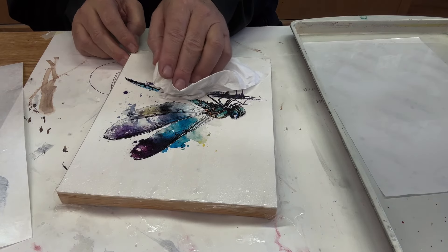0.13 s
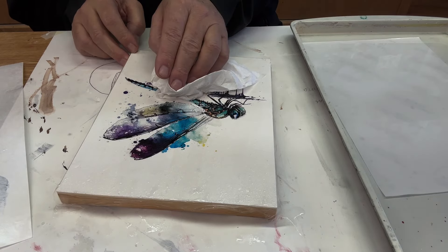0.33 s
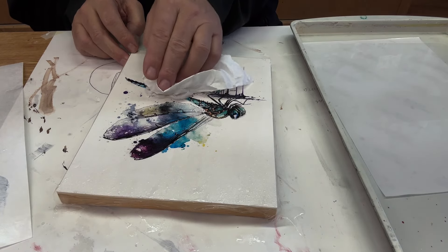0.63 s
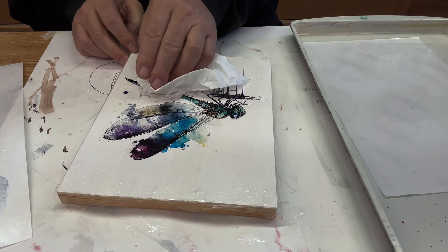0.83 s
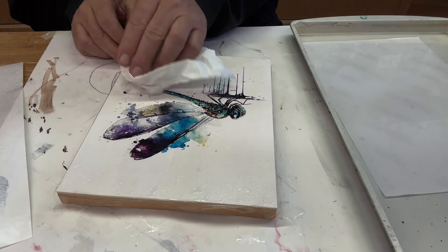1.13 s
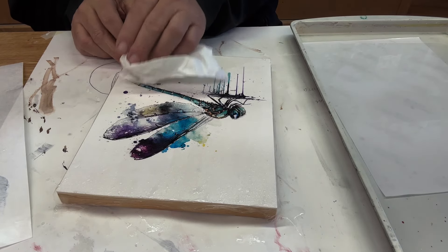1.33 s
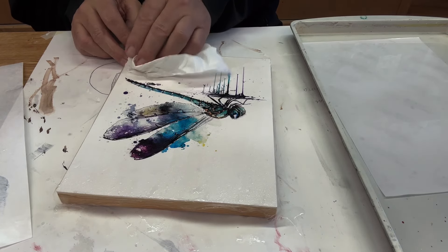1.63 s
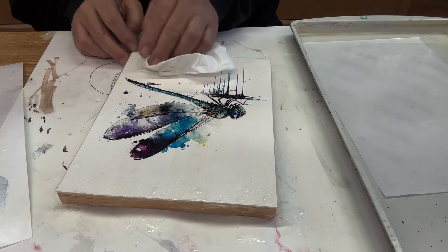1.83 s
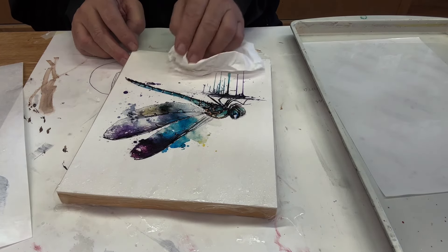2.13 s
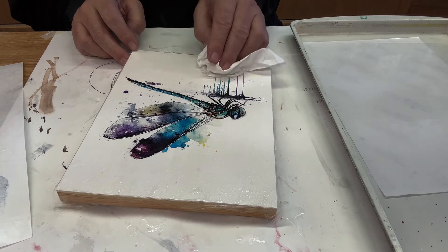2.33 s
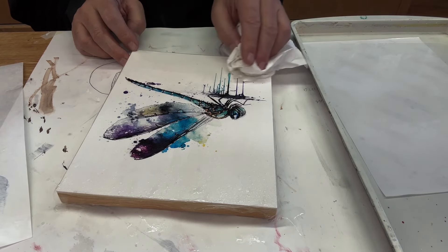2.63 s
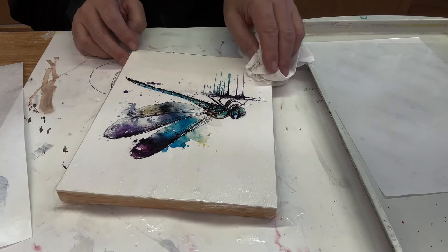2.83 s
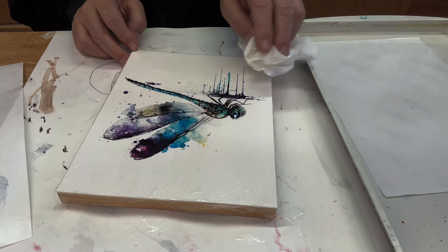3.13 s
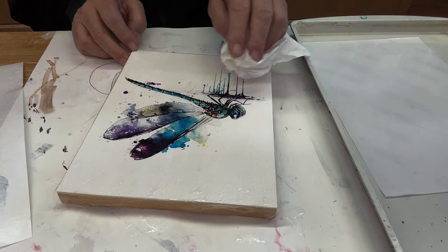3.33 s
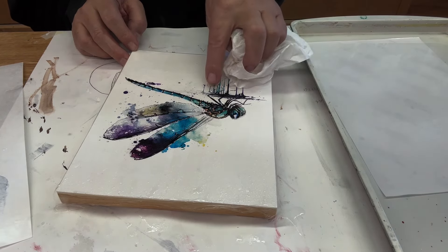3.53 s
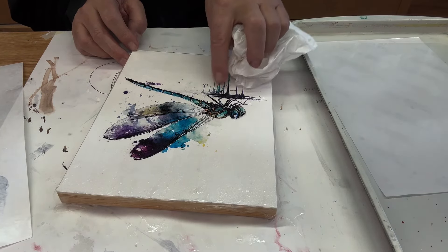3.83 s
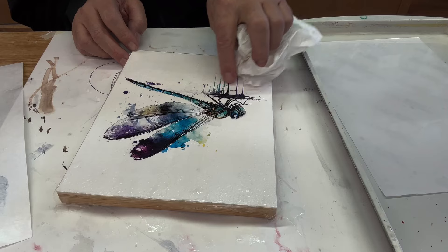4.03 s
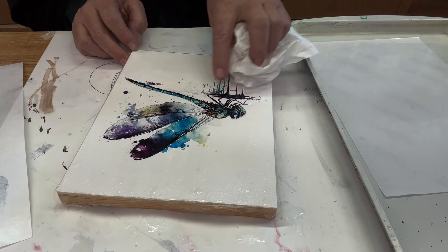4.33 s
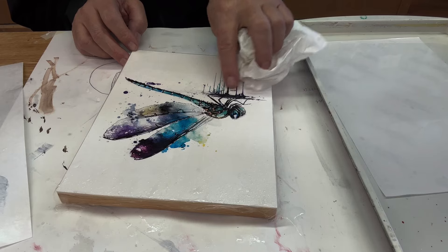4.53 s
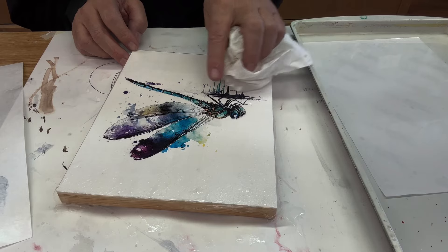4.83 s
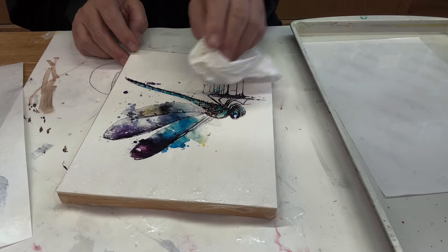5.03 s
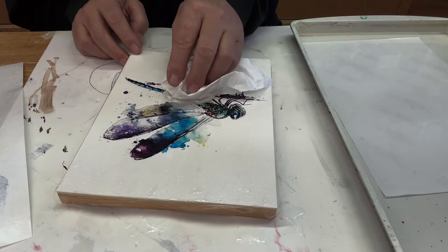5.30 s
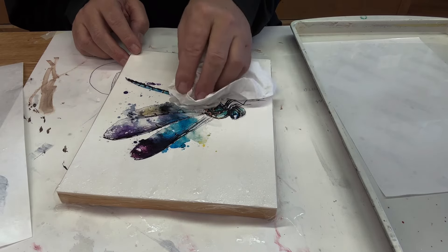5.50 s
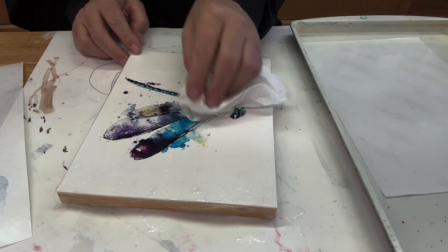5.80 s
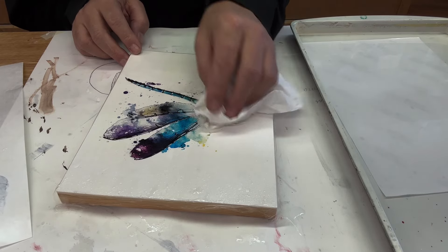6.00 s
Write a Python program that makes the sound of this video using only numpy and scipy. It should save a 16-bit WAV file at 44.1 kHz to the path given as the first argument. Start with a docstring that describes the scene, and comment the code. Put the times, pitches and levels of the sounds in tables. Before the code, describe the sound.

Close mono sound of gentle handwork at a table indoors: breathy paper wipes, irregular soft dabs and small wet clicks. Three short hollow knocks of a light board come quickly, ending in a hard clack. It quietens to paper crackles and thin, grainy skin rubs, before soft crunchy presses return over faint, steady room hush.

```python
"""Damp towel on a wooden panel

A damp paper towel is wiped and dabbed over a wet decal on a panel lying on a work table: filtered noise and
catching fibres make the rub, and short bursts of them the dabs. As the towel is swept off its edge, the panel
rocks and knocks three times, ringing in damped modes, and a sharp click follows. A fingertip then smooths the
decal in short strokes of high, grainy noise, and the dabbing resumes. Low booms of the table, small clicks and
paper snaps lie between. Close, mono, with sparse reflections and the steady hush of a quiet room."""
import sys
import numpy as np
from scipy import signal
from scipy.fft import rfft, irfft, next_fast_len
from scipy.io import wavfile
from scipy.ndimage import uniform_filter1d

SR = 44100
rng = np.random.default_rng(int(sys.argv[2]) if len(sys.argv) > 2 else 0)


def transcribe(u):
    """Save the signal u as a 16-bit wav file named by the first command-line argument.

    u: samples, shape (n,) or (channels, n), limited to [-1, 1]; the rate is SR.
    q: integer samples, one column per channel.
    """
    v = np.clip(np.atleast_2d(u).T, -1, 1)
    q = np.round(v * 32767).astype(np.int16)
    wavfile.write(sys.argv[1], SR, q)


N = 271656
TIME = np.arange(N) / SR  # s

# the towel is pressed down and peels off again:
# (time of the peak [s], half length [s], level [dB], weight on the panel [dB], level of the peel [dB])
DABS = [(0.848, 0.023, -49, -9, -59.5), (1.068, 0.015, -44, -9, -56), (1.262, 0.02, -42.5, -8.5, -61),
        (1.478, 0.012, -39.5, -7, -55.5), (1.681, 0.013, -41, -13, -56.5), (1.889, 0.014, -41.5, -6, -56),
        (2.13, 0.0073, -45.5, -9, -62), (2.381, 0.0063, -40.5, -2.5, -57), (4.115, 0.012, -55.5, -5, -92),
        (5.182, 0.0026, -47, -2, -45), (5.513, .012, -41, -5, -51.5), (5.694, 0.014, -42, -3.5, -49),
        (5.883, 0.019, -42.5, -2, -50.5), (6.076, 0.017, -42, -4, -54)]


def amp(db):
    """Decibels to gain."""
    return 10 ** (np.asarray(db) / 20)


def unit(x):
    """Scales to rms 1."""
    return x / np.sqrt(np.mean(x ** 2) + 1e-20)


def peaked(x, db):
    """Scales to a given peak level."""
    return amp(db) * x / (abs(x).max() + 1e-20)


def add(mix, s, sound):
    """Mixes a sound in at time s."""
    part = mix[max(round(s * SR), 0):][:len(sound)]
    part += sound[:len(part)]


def colour(x, spectrum):
    """Filters by a spectrum drawn on a log-frequency axis; rms 1."""
    hz, db = np.transpose(spectrum)
    size = next_fast_len(len(x))
    bins_hz = np.fft.rfftfreq(size, 1 / SR)
    gain = amp(np.interp(np.log(bins_hz + 1), np.log(hz), db))
    return unit(irfft(rfft(x, size) * gain, size)[:len(x)])


def drift(rate_hz):
    """Slow random wander of rms 1."""
    hz = np.fft.rfftfreq(N, 1 / SR)
    smoothed = rfft(rng.standard_normal(N)) / (1 + (hz / rate_hz) ** 2)
    return unit(irfft(smoothed, N))


def swell(s, rise, fall):
    """A smooth bell-shaped rise to 1 at time s, and a smooth fall."""
    out = np.zeros(N)
    near = slice(*np.searchsorted(TIME, [s - 4 * rise, s + 4 * fall]))
    t = TIME[near] - s
    out[near] = np.exp(-(t / np.where(t < 0, rise, fall)) ** 2)
    return out


def ring(modes, wave=np.sin):
    """Damped modes (frequency [Hz], level [dB], t60 [s]) after one impulse."""
    t = np.arange(SR // 4) / SR
    return sum(amp(db - 60 * t / t60) * wave(2 * np.pi * hz * t) for hz, db, t60 in modes)


def friction(spectrum, per_s, spread_db, grainy):
    """Countless tiny slips blur to a hiss; a share of the energy comes as separate catches of fibres."""
    sizes = amp(spread_db * np.minimum(rng.exponential(1, N), 4))
    catches = sizes * rng.choice([-1, 1], N) * (rng.random(N) < per_s / SR)
    share = np.clip(grainy, 0, 1)
    slips = np.sqrt(1 - share) * rng.standard_normal(N)
    return colour(np.sqrt(share) * unit(catches) + slips, spectrum)


def shifting(x, tilt_db, patchy_db):
    """Folds of the wad come and go: the hiss tilts (dB per octave), and patches of it swell and fade."""
    hz, t, z = signal.stft(x, SR, nperseg=256)
    across_hz = uniform_filter1d(rng.standard_normal(z.shape), size=5, axis=0)
    patches = unit(uniform_filter1d(across_hz, size=28, axis=1))
    octaves = np.log2(np.clip(hz, 2500, 9500) / 5000)[:, None]
    tilt = np.interp(t, TIME, tilt_db + 2.0 * drift(rate_hz=13))
    gain_db = octaves * tilt + patchy_db * patches
    return unit(signal.istft(z * amp(gain_db), SR, nperseg=256)[1][:N])


def crease(hz):
    """The dry snap of one fold of paper: four high modes that die within milliseconds."""
    return ring([(hz, 0, .004), (hz * 1.31, -3, .004), (hz * 1.7, -9, .003), (hz * 0.81, -5, .003)])


def room_hush():
    """Steady noise in the colour of the quiet room."""
    # (frequency [Hz], relative level [dB])
    hush_spectrum = [(20, -6.5), (75, -18.5), (120, -3), (175, -16.5), (240, -4), (300, -20), (700, -25.5),
                     (1200, -22.5), (1800, -22.5), (9000, -23), (15500, -26.5)]
    level_db = -65.5
    return amp(level_db) * colour(rng.standard_normal(N), hush_spectrum)


def rubbing():
    """Contact, slides and peels add up in power; each weighs on rasp and brightness by its share of it."""
    # the held wad rustles faintly as it touches the panel: (time [s], level [dB])
    contact_curve = [(0, -55), (.27, -61.5), (.37, -70), (.43, -62.5), (.65, -59), (.8, -62.5),
                     (1.29, -59.5), (1.55, -54.5), (2.02, -57.5), (2.26, -66), (2.8, -62), (3.35, -69),
                     (3.9, -71.5), (4.2, -80.5), (4.79, -74.5), (4.92, -58.5), (5.45, -57.5), (6.16, -61)]
    # the towel slides, gathering speed and slowing: (time of full speed [s], rise [s], fall [s],
    # level [dB], rasp of the surface [dB], brightness [dB per octave])
    slides = [(0.059, 0.23, 0.17, -51, 2, -1.5), (.52, 0.078, 0.11, -59.5, 4, 3.5),
              (.74, 0.046, .03, -64.5, 9, 1), (1.345, 0.022, .14, -51, 2.5, 1),
              (2.141, 0.078, 0.064, -49.5, -1.5, -0.5), (2.385, 0.043, 0.05, -52.5, 2, -1.5),
              (2.621, 0.052, .1, -49, 3, 1), (2.889, 0.042, 0.088, -51, 3.5, 2),
              (3.14, .12, 0.18, -57, -1, -1), (3.438, 0.042, 0.1, -49.5, 0.5, 0.5),
              (3.63, 0.064, 0.032, -62, 1, 1.5), (4.02, 0.092, .05, -64.5, -0.5, 3),
              (4.34, 0.048, 0.1, -61, -1, 3), (4.446, 0.025, 0.024, -56, 0.5, -2),
              (4.56, 0.079, 0.063, -59.5, -6.5, -2), (4.935, 0.047, 0.033, -57.5, -2.5, 3.5),
              (5.05, 0.03, 0.036, -57.5, -1.5, 4), (5.165, 0.041, 0.059, -49.5, -8, 2),
              (5.394, 0.039, 0.039, -51.5, -2, -0.5)]
    peel_delay_s, peel_rise_s, peel_fall_s = 0.071, 0.038, 0.023  # the wad lets go a moment after each press

    # each move: (gain, rasp [dB], brightness [dB per octave])
    moves = [(amp(np.interp(TIME, *np.transpose(contact_curve))), -1, 0)]
    for s, rise, fall, db, rasp_db, tilt_db in slides:
        moves.append((amp(db) * swell(s, rise, fall), rasp_db, tilt_db))
    peels = sum(amp(peel_db) * swell(s + peel_delay_s, peel_rise_s, peel_fall_s) for s, *_, peel_db in DABS)
    moves.append((peels, -0.5, -2.6))

    gains, rasps, tilts = map(np.array, zip(*moves))
    power = gains ** 2
    total = power.sum(0)
    return 10 * np.log10(total), rasps @ power / total, tilts @ power / total


def towel():
    """Fibres hiss, the surface rasps and the panel drones, all fluttering with the same uneven grip."""
    # colours of the three layers: (frequency [Hz], relative level [dB])
    hiss_spectrum = [(900, -29), (2100, -5.5), (2900, 2), (3500, 1), (4500, 1), (5300, 0.5), (6300, 0),
                     (8300, -2.5), (10500, -8.5), (15500, -25.5)]
    rasp_spectrum = [(350, -10.5), (700, -5), (920, -5), (1180, 1), (1500, -4.5), (1850, -2.5),
                     (2400, -5.5), (4000, -23)]
    drone_spectrum = [(25, -34.5), (70, -1), (130, 2.5), (180, 1), (250, 2.5), (400, 3.5), (600, -2),
                      (800, -2), (1400, -22)]
    creases_per_s, crease_db = 7.7, 7  # small creases give way at random; level against the rub

    level_db, rasp_db, tilt_db = rubbing()
    hiss = shifting(friction(hiss_spectrum, per_s=2000, spread_db=3.5, grainy=0.31), tilt_db, patchy_db=2.1)
    rasp = friction(rasp_spectrum, per_s=500, spread_db=2.0, grainy=0.33)
    drone = friction(drone_spectrum, per_s=180, spread_db=0.5, grainy=0.55)
    folds = rng.uniform(-1.2, 1, N) * (rng.random(N) < creases_per_s / SR)
    creases = signal.fftconvolve(folds, crease(hz=6500))[:N]

    effort_db = level_db + 58.5  # above a light rub
    # rasp and drone grow more slowly than the hiss: level at a light rub, plus dB per dB of effort
    rasp_level_db = -58 + 0.78 * effort_db + rasp_db
    drone_level_db = -62 + 0.58 * effort_db
    paper = amp(level_db) * (amp(0.1) * hiss + amp(crease_db) * creases)
    grip = amp(1.42 * drift(rate_hz=100) + 0.25 * drift(rate_hz=26))
    return grip * (paper + amp(rasp_level_db) * rasp + amp(drone_level_db) * drone)


def clicks():
    """Short hollow ticks, hard or wet, with a bright top, and the drier snaps of creases."""
    # hard clicks and wet ticks: (time [s], peak before the low-pass [dB], pitch [Hz],
    # bright top against the hollow part [dB])
    ticks = [(0.021, -33.5, 1100, -14), (.356, -50, 1850, -5), (0.405, -47.5, 1280, 2.5),
             (.516, -39.5, 1150, -10), (0.64, -40.5, 760, -13), (0.8282, -29, 1290, -22),
             (2.67, -33.5, 1850, -20), (2.772, -33.5, 1090, -10), (2.798, -40, 620, -14),
             (2.953, -36.5, 1180, -8), (2.9873, -31.5, 1120, 7), (3.315, -45, 1000, -9),
             (3.736, -39.5, 635, -17), (4.93, -43, 1400, -3.5), (5.383, -40, 1240, -0.5)]
    # sharp creases of the paper snap: (time [s], peak before the low-pass [dB], pitch [Hz])
    snaps = [(0.5162, -31.5, 7560), (0.828, -25, 9300), (2.54, -33, 6600), (2.605, -27, 4040),
             (2.8723, -22, 4240), (3.171, -33, 7600), (3.238, -33.5, 5500), (3.288, -29.5, 6200),
             (4.331, -33, 7550), (4.603, -33.5, 6500), (5.152, -31, 3520), (5.174, -27.5, 3700),
             (5.914, -25.5, 5670)]
    # the bright top of a tick: (frequency [Hz], level [dB], t60 [s])
    top_modes = [(2810, 1.5, 0.0094), (4870, 4.5, 0.0035), (5400, -16, 0.02), (8350, -5.5, 0.0087)]

    out = np.zeros(N)
    top = ring(top_modes)
    onset = 1 - np.exp(-np.arange(len(top)) / (SR * 0.00031))  # damp surfaces meet softly
    for s, db, hz, top_db in ticks:
        hollow = ring([(hz, 0, .017), (hz * 1.43, -5, .009), (hz * 0.43, -9, .012)])
        add(out, s, peaked(hollow * onset, db) + peaked(top * onset, db + top_db))
    for s, db, hz in snaps:
        add(out, s, peaked(crease(hz), db))
    # wet paper swallows the highest treble
    return signal.sosfilt(signal.butter(2, 10500, fs=SR, output="sos"), out)


def bumps():
    """The hands nudge the table top: soft, low booms of wavering pitch."""
    # (time [s], length [s], peak level [dB], mean pitch [Hz])
    nudges = [(0.067, 0.13, -53, 94), (0.547, 0.047, -52, 133), (.86, 0.081, -59, 71.5),
              (1.192, 0.027, -52, 104), (1.206, 0.14, -58.5, 60.5), (2.425, 0.065, -49, 124),
              (2.96, 0.12, -56.5, 147), (3.57, 0.092, -66, 69.6), (4.43, 0.044, -57.5, 169)]
    out = np.zeros(N)
    for s, length, db, hz in nudges:
        u = np.linspace(0, 1, int(length * SR))
        pitch = hz * (1 + 0.15 * drift(rate_hz=63)[:len(u)])
        turns = np.cumsum(pitch) / SR
        boom = u * (1 - u) ** 1.44 * np.sin(2 * np.pi * turns)
        add(out, s, peaked(boom, db))
    return out


def dabs():
    """Each press crushes the wad in a short crunch and pushes softly on the wood."""
    # colour of the crunch: (frequency [Hz], relative level [dB])
    crush_spectrum = [(300, -6), (650, -5), (820, -1), (1100, 4.5), (1400, -2.5), (1750, -3.5),
                      (2250, -1.5), (3100, -2), (4300, -2), (5400, -5), (8000, -6.5), (10500, -13.5),
                      (15500, -23)]
    push_spectrum = [(20, -12), (50, -0.5), (120, -16), (240, 7.5), (480, -0.5), (620, 3.0), (900, -10),
                     (2000, -41)]
    push_lag_s = 0.0029  # the wad is crushed first, then the weight reaches the wood

    crunch = friction(crush_spectrum, per_s=2600, spread_db=2.5, grainy=0.54)
    crunch = shifting(crunch, tilt_db=-0.1, patchy_db=1.9)
    push = colour(rng.standard_normal(N), push_spectrum)
    out = np.zeros(N)
    for s, half, db, weight_db, _ in DABS:
        rise, fall = 0.97 * half, 1.18 * half
        crushed = swell(s, rise, fall) * crunch
        pushed = amp(weight_db) * swell(s + push_lag_s, rise, fall) * push
        out += amp(db) * (crushed + pushed)
    return out


def knocks():
    """A cushioned blow rings the panel; the table answers a few milliseconds later."""
    # the panel hits the table, lightly under the towel or hard when it rocks:
    # (time [s], peak before the high-pass and answer [dB], contact time [s], extra flex of its middle [dB])
    blows = [(1.381, -43, 0.0023, 12), (1.408, -41, 0.0026, 16), (1.438, -40, 0.0033, 16),
             (1.489, -37.5, 0.0031, -2), (1.9, -38.5, 0.0027, 2), (2.139, -45, 0.0034, 0),
             (2.3869, -19.5, 0.0029, 12), (2.606, -21, 0.0027, 0), (2.865, -33, 0.00046, -2),
             (2.8732, -11.5, 0.0022, -16), (2.8795, -24, 0.002, 0), (5.1437, -40, 0.0019, 30),
             (5.1511, -35.5, 0.0025, 28), (5.175, -36.5, 0.0026, 32), (5.192, -48, 0.0026, 5),
             (5.697, -41, 0.0038, 19), (5.885, -46, 0.0049, 7)]
    # what the panel rings with: (frequency [Hz], level [dB], t60 [s])
    panel_modes = [(113, -41, 0.12), (168, -18, 0.086), (340, -23, 0.059), (370, -26.5, 0.11),
                   (452, 4, 0.023), (477.7, -16.5, 0.15), (506, -0.5, 0.041), (594, 3.5, 0.04),
                   (1130, -19, 0.043)]
    flex_mode = 2  # row of the mode that a blow on the middle of the panel favours

    out = np.zeros(N)
    for s, db, contact, flex_db in blows:
        modes = [(hz, mode_db + flex_db * (k == flex_mode), t60)
                 for k, (hz, mode_db, t60) in enumerate(panel_modes)]
        phase = np.minimum(np.arange(SR // 100) / (SR * contact), 1)
        force = np.sin(np.pi * phase) ** 2
        thud = peaked(-signal.fftconvolve(ring(modes, np.cos), force), db)
        add(out, s, thud)
        add(out, s + 0.00495, amp(-13) * thud)
    # a high-pass thins out the deepest bass below the knocks
    return signal.sosfilt(signal.butter(2, 60, "high", fs=SR, output="sos"), out)


def chatter(rough):
    """As the panel settles, its edge skips on the table in quick, uneven slips."""
    # (start [s], length [s], level [dB], mean slips per second [Hz])
    slip_burst = (2.896, .054, -44.5, 490)
    s, length, db, hz = slip_burst
    size, out = int(length * SR), np.zeros(N)
    turns = np.cumsum(hz * (1 + rough * drift(rate_hz=57)[:size])) / SR
    grip = signal.windows.tukey(size, .5) * amp(1.6 * drift(rate_hz=75)[:size])
    add(out, s, amp(db) * unit(grip * np.sin(2 * np.pi * turns)))
    return out


def fingertip():
    """Skin sliding on the wet film chatters with a thin, high sizzle."""
    # (start [s], length [s], level [dB], share of the stroke spent swelling and fading [0-1])
    strokes = [(3.725, 0.074, -51, 0.46), (3.986, 0.11, -50, 0.82), (4.48, 0.13, -51, 0.95)]
    # colour of the sizzle: (frequency [Hz], relative level [dB])
    skin_spectrum = [(100, -9), (400, -9.5), (620, 3.5), (850, -15), (1150, 6), (1450, -9), (1800, -2.5),
                     (2300, -13), (3700, -7), (6300, -4), (7400, -2), (8150, 3), (8900, -3), (15500, -20)]
    pressure = np.zeros(N)
    for s, length, db, soft in strokes:
        add(pressure, s, amp(db) * signal.windows.tukey(int(length * SR), soft))
    sizzle = friction(skin_spectrum, per_s=2500, spread_db=-2.0, grainy=0.32)
    return pressure * sizzle * amp(1.2 * drift(rate_hz=110))


def hollowed(x, notch_hz, width_hz):
    """The bounce off the face of the panel cancels part of one band of the direct sound."""
    # how far the towel is over the face of the panel: (time [s], depth of the cancelled band [0-1])
    over_panel = [(0, 0.55), (1.9, 0.5), (2.4, 0.15), (3.6, 0.08), (4.9, 0.26), (5.3, 0.49), (6.16, 0.8)]
    band = signal.lfilter(*signal.iirpeak(notch_hz, notch_hz / width_hz, fs=SR), x)
    return x - np.interp(TIME, *np.transpose(over_panel)) * band


def room(x, wet_db, t60):
    """Sparse reflections from table and walls die away quickly."""
    t = np.arange(SR // 2) / SR
    # about 3000 reflections per second, none in the first 4 ms
    taps = rng.standard_normal(len(t)) * (rng.random(len(t)) < 3000 / SR) * (t > .004)
    tail = colour(taps * amp(-60 * t / t60), [(100, 0), (600, 0), (3000, -3), (14000, -8)])
    return x + amp(wet_db) * signal.fftconvolve(x, tail / np.linalg.norm(tail))[:N]


def scene():
    """Hand sounds and knocks over the steady hush of the room."""
    paper = hollowed(towel() + dabs(), notch_hz=2185, width_hz=950)
    hands = room(paper + fingertip() + clicks(), wet_db=-20.0, t60=0.11)
    panel = room(knocks() + chatter(rough=0.14) + bumps(), wet_db=-21.5, t60=0.36)
    return (hands + panel + room_hush())[None]


def record(dry):
    """A steep low-pass limits the band at the top of the treble."""
    edge_hz = 15800
    low_pass = signal.firwin(511, edge_hz, window=("kaiser", 9), fs=SR)
    return signal.oaconvolve(dry, low_pass[None], "same")


dry = scene()
out = record(dry)
transcribe(out)
```